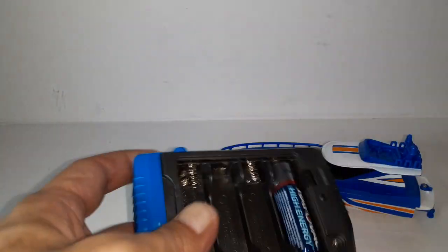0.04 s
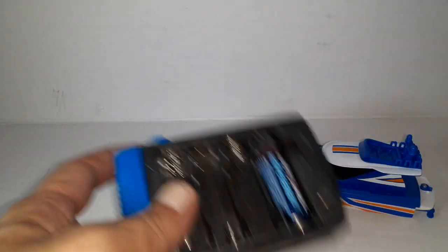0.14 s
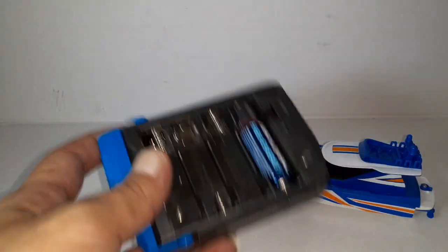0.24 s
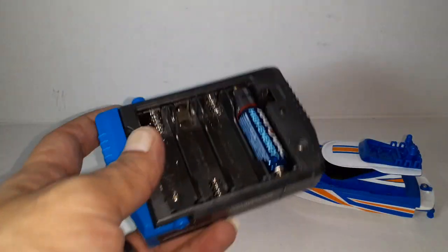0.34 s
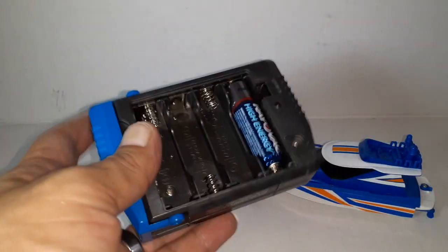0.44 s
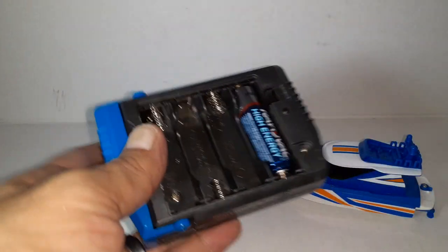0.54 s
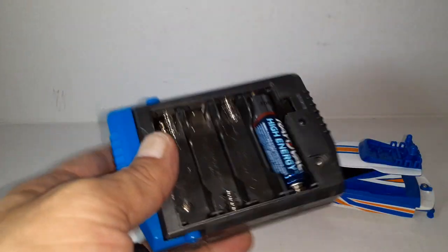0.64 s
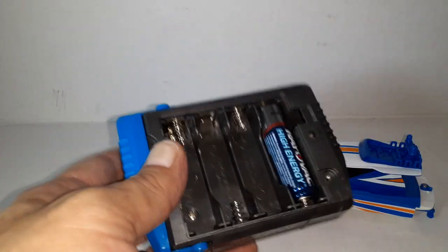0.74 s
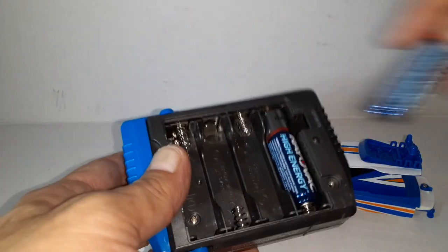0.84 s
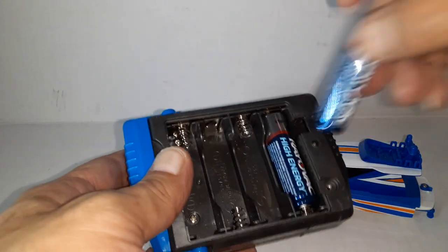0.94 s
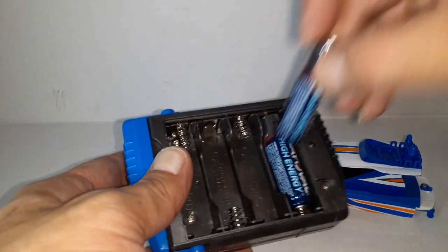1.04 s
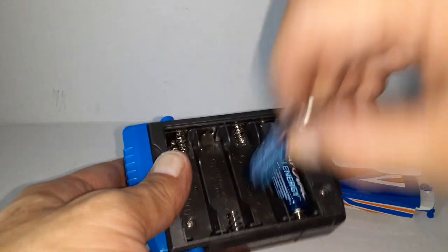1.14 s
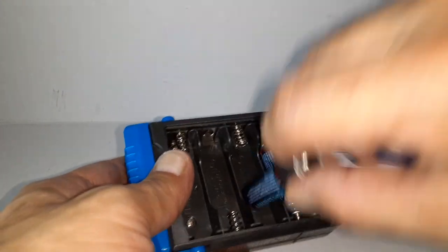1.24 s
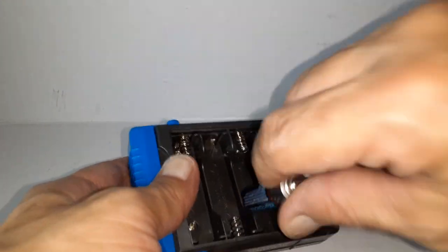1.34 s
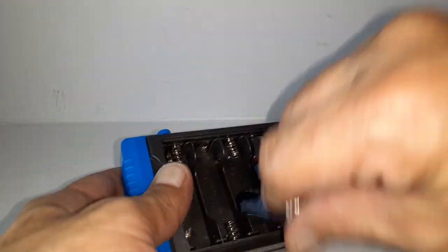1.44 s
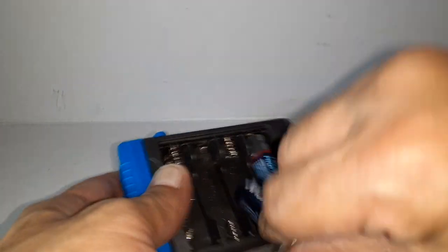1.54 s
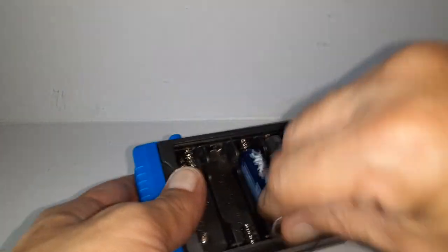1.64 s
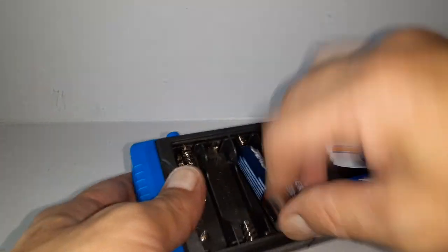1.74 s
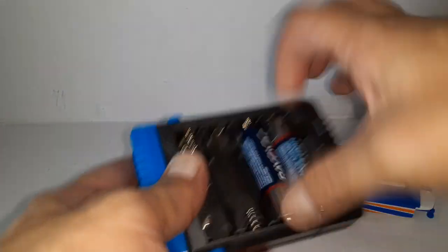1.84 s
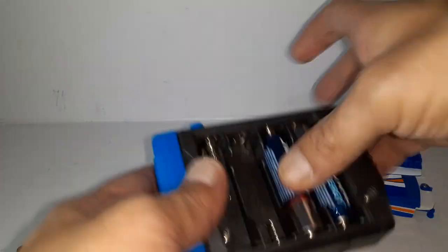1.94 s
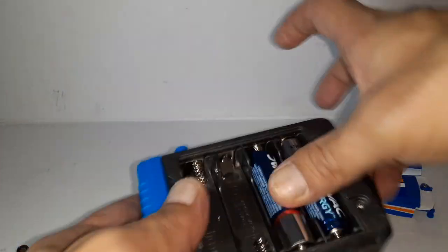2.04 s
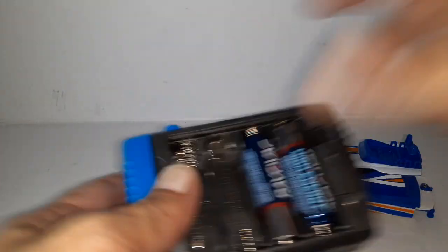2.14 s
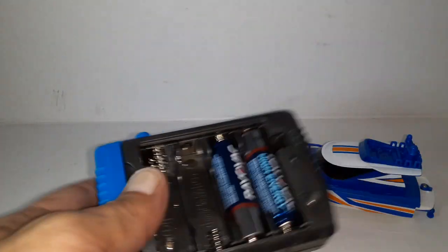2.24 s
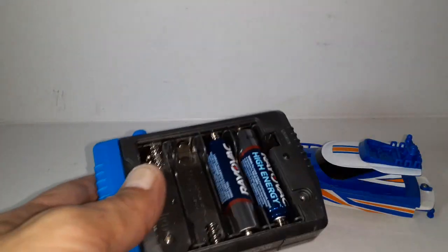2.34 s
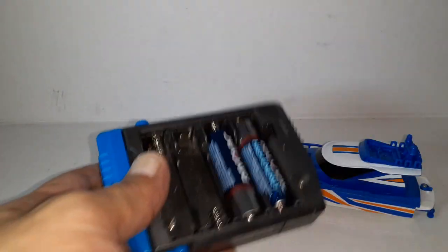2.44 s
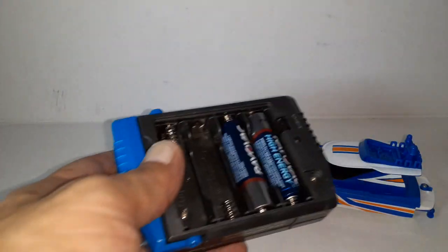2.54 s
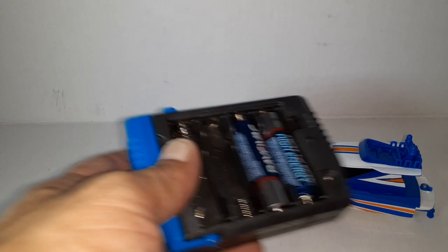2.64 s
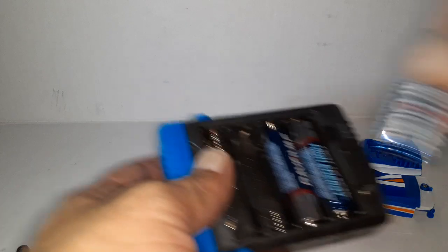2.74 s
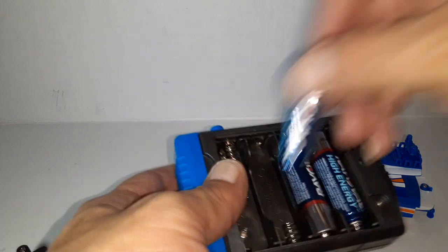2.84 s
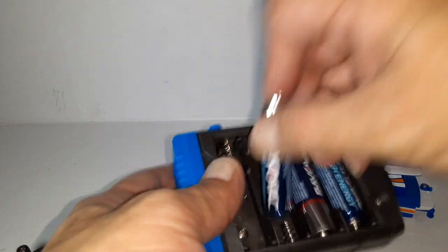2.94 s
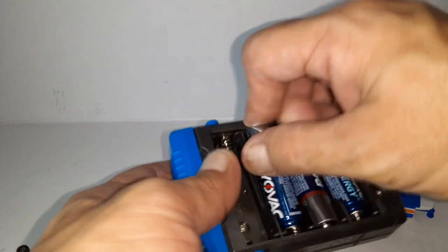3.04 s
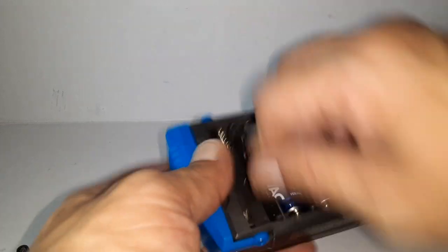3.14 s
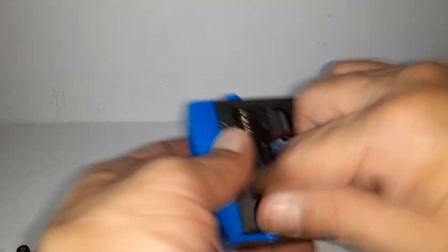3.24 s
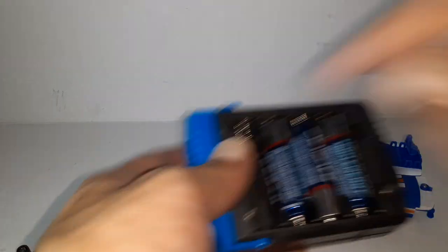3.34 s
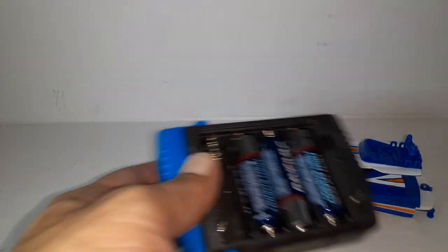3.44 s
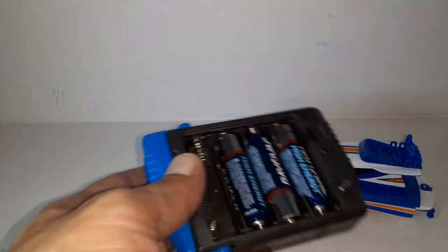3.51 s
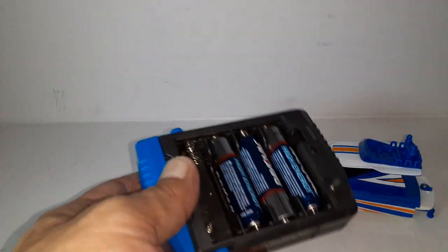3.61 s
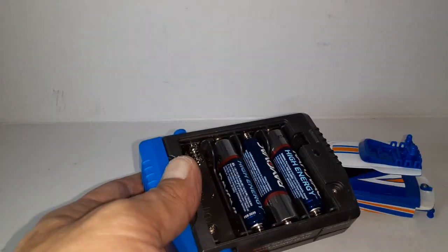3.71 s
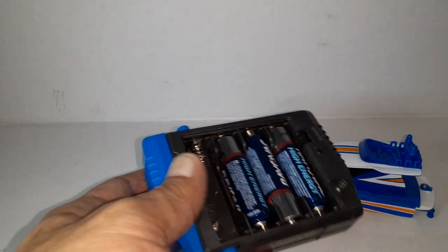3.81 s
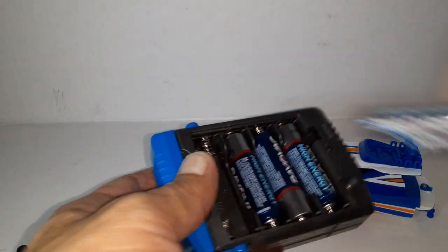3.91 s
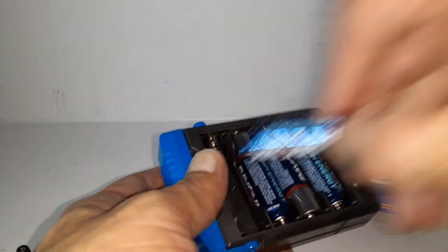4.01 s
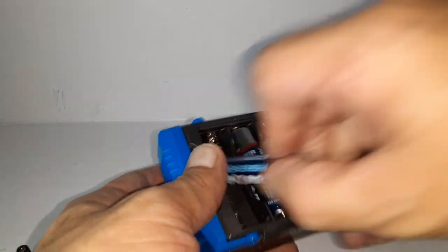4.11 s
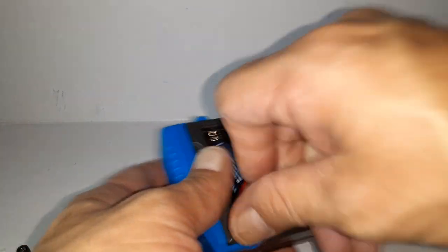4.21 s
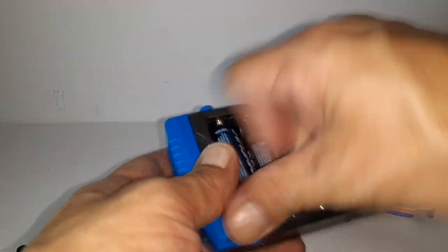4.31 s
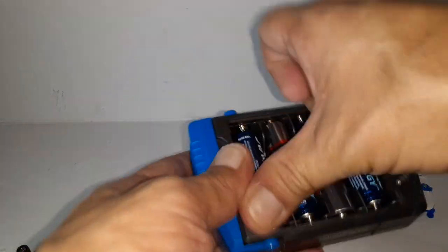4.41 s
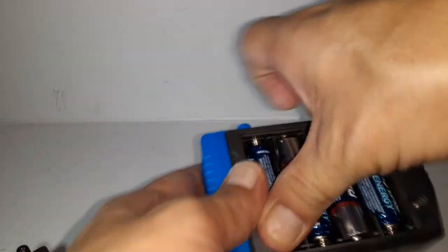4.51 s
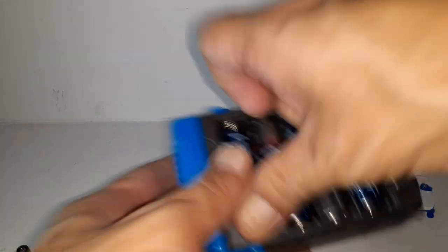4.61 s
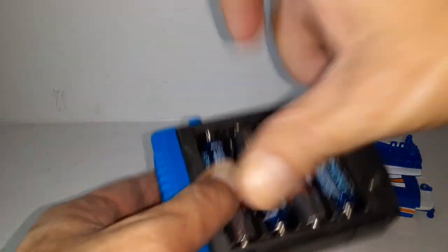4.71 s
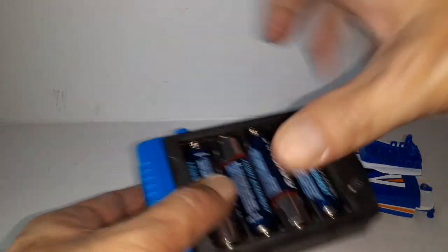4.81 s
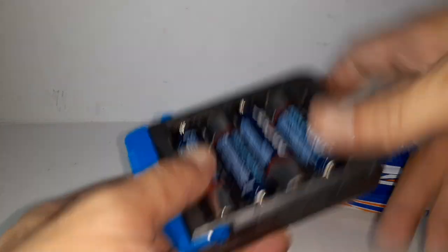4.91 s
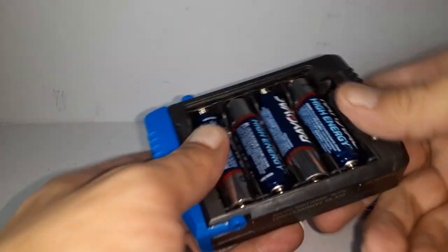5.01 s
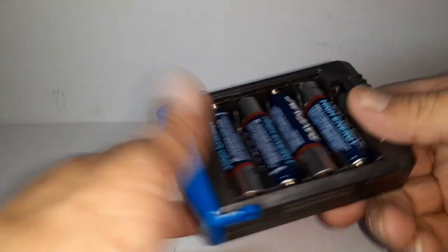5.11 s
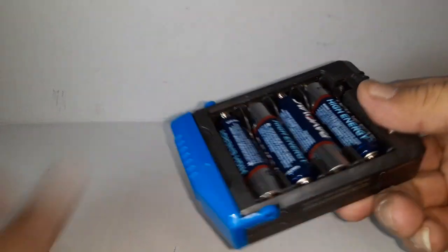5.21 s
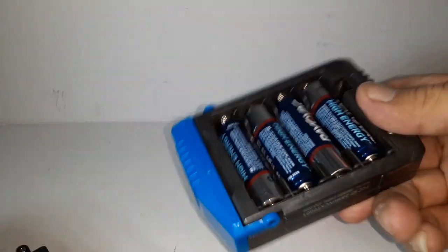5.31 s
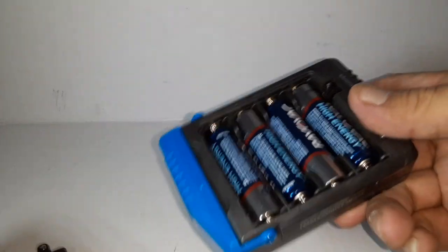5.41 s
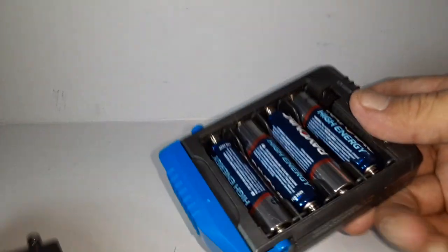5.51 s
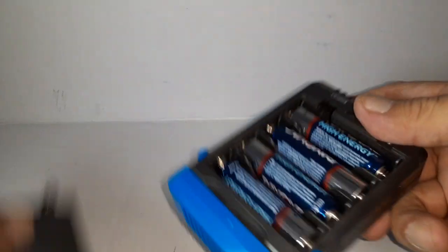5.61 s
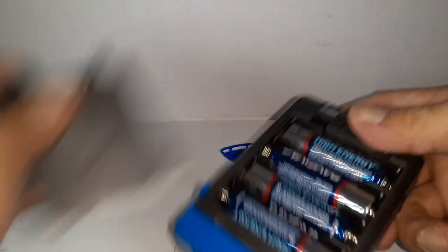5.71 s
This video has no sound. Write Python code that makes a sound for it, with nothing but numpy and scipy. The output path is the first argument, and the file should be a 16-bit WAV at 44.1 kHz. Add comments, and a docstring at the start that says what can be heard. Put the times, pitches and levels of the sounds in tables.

```python
"""Light plastic clicks and scrapes sound close by: three small batteries are pushed one by one into a
hand-held compartment. Each impact excites the modes of the case and ticks on the metal contacts;
in between, cells and springs slide by stick-slip friction. At the end the loose cover is dragged
off the table. A small room reverberates, over the rumble of the hands and a low, wavering hum."""
import sys
import numpy as np
from scipy import signal
from scipy.fft import rfft, irfft, next_fast_len
from scipy.io import wavfile

SR = 44100
rng = np.random.default_rng(int(sys.argv[2]) if len(sys.argv) > 2 else 0)


def store_pcm(level_fs):
    """Save levels as 16-bit WAV."""
    pcm = np.round(np.clip(level_fs, -1, 1) * 32767).astype(np.int16)
    wavfile.write(sys.argv[1], SR, np.atleast_2d(pcm).T)


N = 254016
RING_T = np.arange(2048) / SR  # time axis of one contact [s]

# impacts of a cell on the case: (time [s], wall level [dB], hollow re wall [dB], tick re wall [dB])
CELL_IMPACTS = [(0.0084, -34.5, -16, -4.5), (0.016, -37, -10.5, 1.5), (0.0494, -46, -9, -15),
                (0.0725, -47.5, -12, -10), (0.1686, -45, -10, -5), (0.2362, -44.5, -14, -7),
                (0.3467, -41, -9, -1), (0.4716, -56.5, -2, 1.5), (0.5267, -50, -7, -7),
                (0.7094, -50, -11, -8.5), (0.729, -45, -22, -12), (0.811, -40, -15.5, 0),
                (1.0629, -40, -2, -8), (1.1045, -30.5, -9.5, -8), (1.257, -33.5, -4.5, -11),
                (1.2893, -21.5, -12.5, -2.5), (1.3154, -35.5, -12, -2), (1.5546, -36.5, 4, -12),
                (1.5649, -28, -9, -10.5), (1.5792, -30.5, -21, -10.5), (1.6271, -31, -2, -4),
                (1.6484, -20.5, 3.5, -3.5), (1.6832, -17.5, -12, -9.5), (1.702, -24, -3.5, -11),
                (1.7915, -19.5, -1.5, 1), (1.8231, -22.5, -15.5, -12), (1.8696, -21.5, -5.5, 0),
                (1.881, -30, -3.5, -23), (1.893, -19, -17, -6), (1.9825, -27.5, -9, -3.5),
                (2.0269, -34.5, -11.5, -6.5), (2.1288, -39, -15.5, -4.5), (2.1824, -37, -16, -10.5),
                (2.2743, -55.5, -13, 2), (2.8255, -55, -1, -6), (2.937, -27, -12, -6.5),
                (2.9473, -19, -10.5, -1.5), (2.9569, -23.5, -16, -7.5), (2.9742, -30, -12, -2.5),
                (3.022, -30, -23.5, -9.5), (3.0383, -15.5, -9.5, -8), (3.1059, -37, -16.5, -4),
                (3.1422, -19.5, -12.5, -3), (3.2497, -34, -20.5, -8.5), (3.3698, -50, -14.5, -2.5),
                (4.1318, -35.5, -8, -4.5), (4.134, -23, -10, 1), (4.2235, -46.5, -4.5, -12),
                (4.2671, -40, -12, -12), (4.2995, -35, -4, -12), (4.313, -32, -25, -5),
                (4.332, -26.5, -13.5, -12), (4.3527, -33.5, -15, -9), (4.3941, -34.5, -15, -10),
                (4.476, -41.5, -15, 4.5), (4.5883, -46, -15, 1), (4.6757, -37.5, -18, -8),
                (4.7173, -35.5, -14, -4), (4.7226, -33.5, -31, -6), (4.8849, -49.5, -10, -2),
                (5.006, -24.5, -9.5, -10.5), (5.0121, -27.5, -17, -3.5), (5.2706, -51, -1, 1)]
# cells, springs and fingers sliding on the case:
# (start [s], end [s], wall level [dB], hollow re wall [dB], tick re wall [dB])
CASE_STROKES = [(0.013, 0.108, -51, -11, -4.5), (0.18, 0.277, -45, -5.5, -4),
                (0.286, 0.485, -65.5, -3, 3.5), (0.563, 0.619, -78, -2, 12),
                (0.723, 0.765, -49.5, -6, -9.5), (1.059, 1.089, -39.5, -7, -12.5),
                (1.106, 1.199, -75, 8, -11), (1.253, 1.329, -35.5, -2.5, -3),
                (1.552, 1.611, -38.5, -3.5, -1), (1.651, 1.727, -29, -22, -5),
                (1.799, 1.844, -26.5, -8, -5.5), (1.875, 1.956, -45, 2, -4), (1.937, 2.04, -57, 8, -8),
                (2.064, 2.159, -48.5, -5, -8), (2.377, 2.587, -70.5, -12, 8),
                (2.946, 3.133, -39, -7.5, -4.5), (3.15, 3.301, -38, -13, 1), (3.29, 3.337, -43.5, -8, -5),
                (3.498, 3.73, -82, -4, 11.5), (4.14, 4.295, -46.5, -6.5, 0), (4.304, 4.403, -33, -7.5, 3.5),
                (4.446, 4.53, -45, -6, 1), (4.533, 4.658, -54, -4, -2), (4.646, 4.688, -41, -8, -2),
                (4.734, 4.854, -53.5, -2.5, -4), (4.958, 5.094, -47, -6.5, -4.5),
                (5.099, 5.22, -59.5, -2.5, 1.5)]
# modes of the case with its springs: (frequency [Hz], t60 [s], energy [dB])
CASE_MODES = [(643, 0.021, -13), (763, 0.022, -14.5), (994, 0.036, -12.5), (1218, .025, -7),
              (1304, 0.033, -14), (1790, 0.044, 0), (1945, .012, 4), (2204, 0.032, 5), (2193, 0.014, -0.5),
              (2931, 0.029, -6), (3250, 0.027, -13), (4477, 0.019, -5), (4430, 0.0077, -8),
              (5950, .016, -18), (8800, .006, -5.5), (10380, 0.0023, -18.5), (11600, .006, -8.5)]
# spectrum of the first crack of a contact on the case: (frequency [Hz], gain [dB])
CASE_CRACK = [(200, -21), (420, -3.5), (670, -11), (900, -4.5), (1450, -9), (1720, 6.5), (2280, 5.5),
              (2650, -8.5), (3050, -4), (4000, -3.5), (6000, -1), (7900, -7.5), (10500, -4), (16000, -9)]
CASE = (CASE_MODES, CASE_CRACK)


def battery_knocks(firm_db=-18, chatter_s=0.0028):
    """Impact excitation: the cells strike the case, and only the firmest blows chatter."""
    rows = [(at, db, hollow_db, tick_db, chatter_s if db >= firm_db else 0)
            for at, db, hollow_db, tick_db in CELL_IMPACTS]
    return impacts(rows, CASE, gain_db=-1, graze=0.3, graze_s=0.0036)


def spring_ticks(tick_db=9.5, hollow_db=-8.5, chatter_s=0.002):
    """Elastic release: a flicking spring hardly moves the case, so its knock is nearly all metal."""
    # flicks of the contact springs: (time [s], level [dB])
    flicks = [(0.09, -50), (0.55, -55.5), (1.1553, -51), (1.9164, -26.5), (1.9246, -28), (1.953, -35.5),
              (2.09, -43.5), (2.217, -57), (2.4915, -49), (2.503, -51), (2.513, -55.5), (3.0088, -28),
              (3.0945, -36.5), (3.128, -39), (3.275, -32), (4.3709, -33), (4.7797, -41.5), (4.81, -50.5),
              (4.827, -51.5), (4.9509, -50)]
    rows = [(at, db - tick_db, hollow_db, tick_db, chatter_s) for at, db in flicks]
    return impacts(rows, CASE, gain_db=-2.5)


def case_scrapes():
    """Sliding friction: cells, springs and fingers rub the case and keep its modes ringing."""
    return stick_slip(CASE_STROKES, CASE, gain_db=-6.5, slips_per_s=990, scatter_db=5.0)


def catches(count=3, relative_db=-6, spread_db=3.5, brighter_db=3, chatter_s=0.0016):
    """Static friction: a sliding cell catches at random, giving knocks brighter than its scrape."""
    rows = []
    for start, end, db, hollow_db, tick_db in CASE_STROKES:
        along = (np.arange(count) + rng.random(count)) / (count + 1)
        times = start + (end - start) * along
        levels = db + relative_db + spread_db * rng.standard_normal(count)
        rows += [(at, level, hollow_db, tick_db + brighter_db, chatter_s)
                 for at, level in zip(times, levels)]
    return impacts(rows, CASE, gain_db=-1)


def rattles(above_db=-22.5, gap_s=0.012, first_db=-19.5, loss_db=2.5, hollow_db=-11, tick_db=-4):
    """Damped rocking: after a hard knock the cell rocks three times in its bay, ever weaker."""
    rows = []
    for at, db, _, _ in CELL_IMPACTS:
        if db > above_db:
            gaps = gap_s * (1 + 0.3 * rng.uniform(-1, 1, 3))
            rows += [(at + delay, db + first_db - k * loss_db, hollow_db, tick_db, 0)
                     for k, delay in enumerate(np.cumsum(gaps))]
    return impacts(rows, CASE, gain_db=-1)


def jolts():
    """Damped oscillation: a hard push shakes the whole case with a dull thump."""
    # thumps: (time [s], frequency [Hz], level [dB], t60 [s])
    thumps = [(1.663, 118, -39, 0.048), (3.143, 62, -37.5, 0.06), (5.044, 134, -49, 0.12),
              (5.438, 145, -52, 0.079)]
    out, t = np.zeros((2, N)), np.arange(SR // 4) / SR
    for at, hz, db, t60 in thumps:
        thump = undb(db) * np.sin(2 * np.pi * hz * t) * fade(t, t60)
        add(out, at, np.tile(thump, (2, 1)))
    return out


def cover_drag():
    """Impact and friction excite the cover's own modes as it is dragged off the table."""
    # knocks on the table: (time [s], wall level [dB], hollow re wall [dB], tick re wall [dB])
    bumps = [(5.4106, -48, 5, 16.5), (5.4285, -33, 11.5, 5.5), (5.4377, -20, 0.5, -11),
             (5.522, -45, 8.5, 12), (5.599, -46.5, 3, 1), (5.687, -67.5, 6, 13)]
    # slides: (start [s], end [s], wall level [dB], hollow re wall [dB], tick re wall [dB])
    strokes = [(5.39, 5.435, -38.5, 12.5, -0.5), (5.45, 5.53, -47, 6.5, -3), (5.53, 5.63, -55, 5, 10),
               (5.63, 5.72, -59, -12, -3)]
    # modes of the cover on the table: (frequency [Hz], t60 [s], energy [dB])
    modes = [(594, 0.13, -6.5), (813, 0.066, -14.5), (1027, 0.04, -7), (1170, 0.02, -16),
             (1305, 0.0078, -5.5), (1710, 0.1, -5), (2130, 0.021, 4), (2530, 0.011, 8.5),
             (3330, 0.025, -31)]
    # spectrum of the first crack of a contact: (frequency [Hz], gain [dB])
    crack_spectrum = [(200, -26), (600, -7), (1200, 5), (1800, -8.5), (2600, -3), (4000, -4.5), (7000, -9),
                      (12000, -3.5), (17000, -14.5)]
    cover = (modes, crack_spectrum)
    knocks = impacts([(*bump, 0) for bump in bumps], cover, gain_db=-2.5)  # no chatter
    return knocks + stick_slip(strokes, cover, gain_db=-4.5, slips_per_s=1600, scatter_db=2.5)


def impacts(rows, body, gain_db, graze=0.13, graze_s=0.0022, rebound=0.55, count=7):
    """Convolution: a force of grazes, one blow and its rebounds drives the body's impulse response."""
    out = np.zeros((2, N))
    lead = int(graze_s * SR)
    for at, wall_db, hollow_db, tick_db, chatter_s in rows:
        force = np.zeros((1, len(RING_T)))
        before, after = (np.arange(count) + rng.random((2, count))) / count
        force[0, (before * lead).astype(int)] = graze * before * rng.standard_normal(count)
        force[0, lead] = 1
        # rebounds spread over chatter_s; at zero just one remains, right after the blow
        slots = lead + 1 + (after ** 2 * chatter_s * SR).astype(int)
        force[0, slots] += rebound * rng.choice([-1, 1], count) * (1 - after ** 2 / 2)
        blow = signal.fftconvolve(force, impulse_response(body), axes=1)[:, :len(RING_T)]
        knock = radiate(blow, wall_db + gain_db, hollow_db, tick_db)
        add(out, at - lead / SR, np.sqrt(SR / 100) * knock)  # energy of 10 ms at that level
    return out


def stick_slip(strokes, body, gain_db, slips_per_s, scatter_db, grip_db=3, grips_per_s=170, points=4):
    """Stick-slip friction: dense tiny blows ring the body, in spurts as the grip changes."""
    out = np.zeros((2, N))
    for start, end, wall_db, hollow_db, tick_db in strokes:
        size = int((end - start) * SR)
        samples = np.arange(size)
        along = samples / size
        chance, strength = rng.random((2, SR // 2))[:, :size]
        slips = chance < slips_per_s / SR
        force = slips * undb(-scatter_db * np.log(strength + 0.023)) * (-1) ** samples
        force *= undb(grip_db * wander(samples / SR, grips_per_s))
        force *= np.minimum(along * 10, 1) * (1 - 0.3 * along)  # quick onset, then easing off
        # the slips fall on several points of contact, each with its own ring
        point = rng.integers(points, size=SR // 2)[:size]
        rub = sum(signal.fftconvolve((force * (point == k))[None], impulse_response(body), axes=1)
                  for k in range(points))
        add(out, start, np.sqrt(size) * radiate(rub, wall_db + gain_db, hollow_db, tick_db))
    return out


def impulse_response(body, crack_t60=0.021, spot_db=0.58, detune=0.027, echo_db=-12, echo_t60=0.045):
    """Modal superposition: a crack, damped modes weighted anew for each spot, and near echoes."""
    modes, crack_spectrum = body
    hz, t60, db = np.transpose(modes)
    burst = stereo_noise(len(RING_T), 0.11) * fade(RING_T, crack_t60)
    crack = unit(colour(burst, crack_spectrum))
    spot, shift, phase = rng.standard_normal((len(hz), 3)).T
    poles = 2j * np.pi * hz * (1 + detune * shift) - np.log(1000) / t60
    waves = np.exp(np.outer(poles, RING_T))
    amplitude = undb(db + spot_db * spot) / np.sqrt(t60) * rng.choice([-1, 1], len(hz))
    # each mode radiates in its own direction, so the two microphone ports catch it in different phase
    ring = np.imag(np.array([amplitude, amplitude * np.exp(1j * phase)]) @ waves)
    direct = crack + unit(ring)
    # the hands keep moving, so every contact has its own echoes off hands and table
    echoes = reflections(RING_T, correlation=0.4, t60=echo_t60, build_s=0.009)
    return direct + undb(echo_db) * signal.fftconvolve(direct, unit(echoes), axes=1)[:, :len(RING_T)]


def radiate(x, wall_db, hollow_db, tick_db, lowest_hz=480, low_hz=1400, high_hz=3600):
    """Energy partition: the hollow of the box, its walls and the hard tick each take a band."""
    hollow = butter(butter(x, low_hz, "lowpass", order=4), lowest_hz, "highpass", order=2)
    walls = butter(x, (low_hz, high_hz), "bandpass", order=4)
    # contacts that hardly move the case are the smallest, and their tick sits higher
    tick = butter(x, high_hz * undb(0.16 * max(tick_db, 0)), "highpass", order=4)
    return undb(wall_db) * (unit(walls) + undb(hollow_db) * unit(hollow) + undb(tick_db) * unit(tick))


def reflections(t, correlation, t60, build_s):
    """Diffuse field: dense echoes act as noise that builds up and decays exponentially."""
    return stereo_noise(len(t), correlation) * fade(t, t60) * (1 - np.exp(-(t / build_s) ** 2))


def room(x, gain_db=-10):
    """Reverberation: a small room adds a short diffuse tail."""
    # colour of the tail: (frequency [Hz], gain [dB])
    spectrum = [(200, -5.5), (800, -2.0), (2000, -6.5), (5000, -2.3), (10000, -5.5), (16000, 0.5)]
    tail = reflections(np.arange(SR // 2) / SR, correlation=0.2, t60=0.23, build_s=0.008)
    return undb(gain_db) * signal.fftconvolve(x, colour(unit(tail), spectrum), axes=1)[:, :N]


def microphone_ports(x, lag_s=0.000097):
    """Path difference: the right port is further from the case, so it hears later and weaker."""
    # level difference between the ports: (frequency [Hz], left minus right [dB])
    balance = [(100, 20.5), (700, 2.5), (1300, 2.5), (2000, 7), (3000, 8.5), (4400, 1), (8000, 1),
               (15000, 0)]
    left, right = x
    hz = np.arange(N // 2 + 1) * SR / N
    right = irfft(rfft(right) * np.exp(-2j * np.pi * hz * lag_s), N)
    half = np.array(balance) * [1, 0.5]
    return np.array([colour(left, half), colour(right, half * [1, -1])])


def handling(gain_db=-2):
    """Handling noise: moving hands stir a soft low rumble."""
    # envelope of the rumble: (time [s], level [dB])
    envelope = [(0.0, -51.5), (1.09, -56.5), (1.14, -46), (3.05, -52.5), (3.14, -41.5), (3.17, -52),
                (4.09, -56.5), (4.41, -47.5), (4.49, -52.5), (4.78, -43.5), (5.31, -47.5), (5.45, -36),
                (5.47, -45.5), (5.66, -46.5), (5.68, -43), (5.76, -48.5)]
    # its colour: (frequency [Hz], gain [dB])
    spectrum = [(25, -27), (55, -7.0), (75, -13.5), (110, -3.0), (145, 0.0), (210, -4.5),
                (300, -15.0), (600, -24.5), (2000, -46)]
    rumble = colour(stereo_noise(N, 1.0), spectrum)
    level_db = np.interp(np.arange(N) / SR, *np.transpose(envelope))
    return np.sqrt(N) * unit(rumble) * undb(gain_db + level_db)


def background(rumble_db=-55.5, hiss_db=-68, waver_hz=9, waver=0.6):
    """Random modulation makes a hum waver over dull room noise, as of a fan some way off."""
    # room noise and faint hiss: (frequency [Hz], spectral density [dB])
    rumble_spectrum = [(20, -36.5), (35, -24), (52, -1), (70, -11), (100, -5), (145, -4.5), (200, -8),
                       (280, -9), (350, -26.5), (640, -18), (1200, -28.5), (3500, -46.5), (8000, -60),
                       (16000, -36.5)]
    hiss_spectrum = [(300, -22.0), (1500, 11.5), (5000, -0.5), (8000, -9), (11000, 0.5), (16000, -17.0)]
    # hum partials: (frequency [Hz], level [dB])
    partials = [(140, -57.5), (211, -59), (287, -64.5)]
    rumble = colour(stereo_noise(N, 0.29), rumble_spectrum)
    hiss = colour(stereo_noise(N, 0), hiss_spectrum)
    out = np.sqrt(N) * (undb(rumble_db) * unit(rumble) + undb(hiss_db) * unit(hiss))
    t = np.arange(N) / SR
    for hz, db in partials:
        modulation = 1 + waver * (wander(t, waver_hz) + 1j * wander(t, waver_hz))
        out += undb(db) * np.real(modulation * np.exp(2j * np.pi * hz * t))
    return out


def undb(db):
    """Decibels to amplitude ratio."""
    return 10 ** (np.asarray(db) / 20)


def unit(x):
    """Normalisation to unit mean energy per stereo channel."""
    return x / np.sqrt(np.sum(x ** 2) / 2 + 1e-18)


def fade(t, t60):
    """Exponential decay, 60 dB down after t60."""
    return np.exp(-np.log(1000) * t / t60)


def wander(t, rate_hz):
    """Linear interpolation between Gaussian values, rate_hz of them a second."""
    return np.interp(t * rate_hz, np.arange(256), rng.standard_normal(256))


def add(out, at, x):
    """Superposition of x on out from time at."""
    i = max(int(at * SR), 0)
    out[:, i:i + x.shape[1]] += x[:, :max(N - i, 0)]


def colour(x, points):
    """Minimum-phase filter through points of (frequency [Hz], gain [dB])."""
    size = next_fast_len(x.shape[-1] // 2 + 512) * 2
    hz, db = np.transpose(points)
    bin_hz = np.arange(size // 2 + 1) * SR / size
    log_gain = np.log(undb(np.interp(np.log(bin_hz + 1), np.log(hz), db)))
    # folding the cepstrum onto positive time makes the filter causal
    cepstrum = irfft(log_gain)
    cepstrum[1:size // 2] *= 2
    cepstrum[size // 2 + 1:] = 0
    return irfft(rfft(x, size) * np.exp(rfft(cepstrum)))[..., :x.shape[-1]]


def butter(x, hz, kind, order):
    """Butterworth filter: maximally flat in its passband."""
    return signal.sosfilt(signal.butter(order, hz, kind, fs=SR, output="sos"), x)


def stereo_noise(size, correlation):
    """Mid-side mixing gives two channels of white noise with a set correlation."""
    mid, side = rng.standard_normal((2, size))
    return np.sqrt((1 + correlation) / 2) * mid + np.sqrt((1 - correlation) / 2) * np.array([side, -side])


def scene():
    """Superposition of batteries, case, cover and room, a little to the left."""
    floor = (background() + handling()) * undb([[1.5], [-1.5]])
    near = battery_knocks() + spring_ticks() + case_scrapes() + jolts()
    near += cover_drag() + catches() + rattles()
    return undb(1.26) * microphone_ports(near + room(near)) + floor


def record(dry, bass_hz=38, top_hz=16200):
    """Band limiting and saturation: the deepest bass is dropped, peaks clip and the top is cut."""
    clipped = np.clip(butter(dry, bass_hz, "highpass", order=4), -1, 1)
    return signal.sosfilt(signal.ellip(8, 0.2, 70, top_hz, fs=SR, output="sos"), clipped)


dry = scene()
out = record(dry)
store_pcm(out)
```